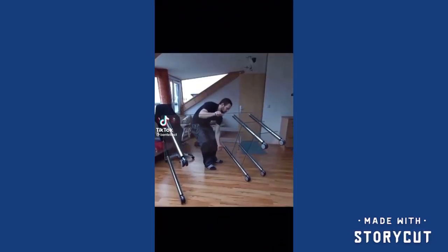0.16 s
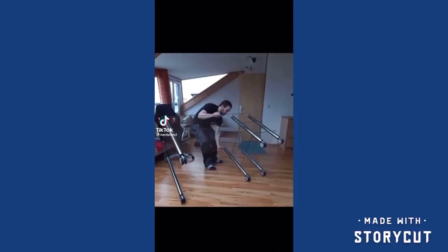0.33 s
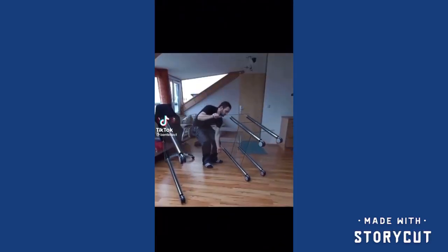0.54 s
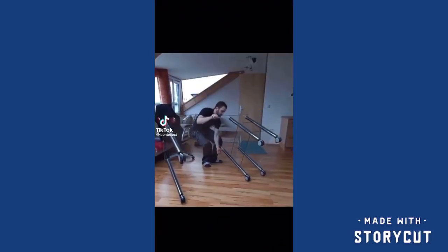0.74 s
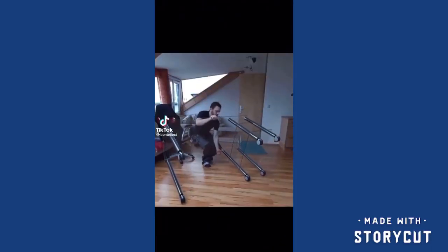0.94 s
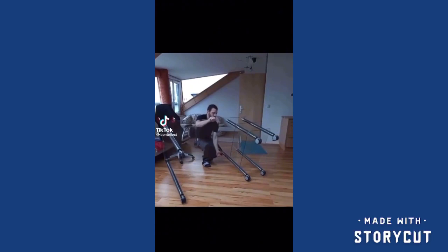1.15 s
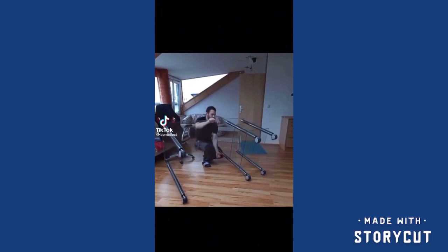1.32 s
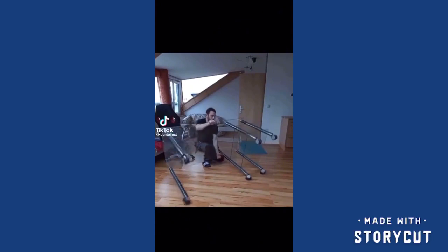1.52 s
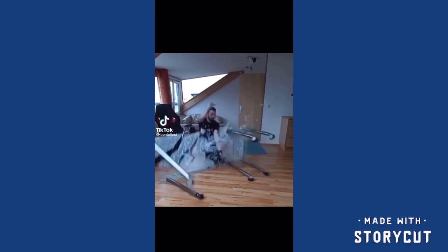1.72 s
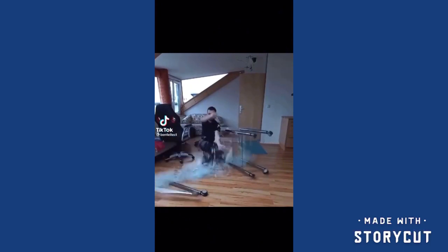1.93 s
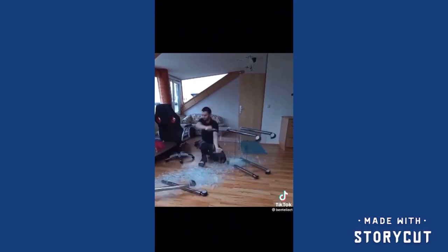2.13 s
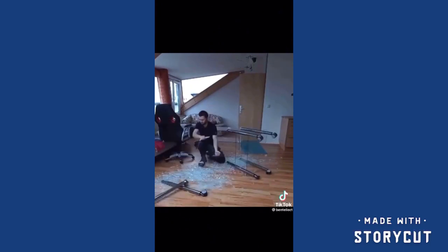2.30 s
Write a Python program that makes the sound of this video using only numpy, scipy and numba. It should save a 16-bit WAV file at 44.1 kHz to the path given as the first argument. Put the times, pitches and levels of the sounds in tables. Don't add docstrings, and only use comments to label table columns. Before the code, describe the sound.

A glass tabletop shatters in a live attic room with a wooden floor. Over low room hum, soles scrape faintly with small knocks from 0 to 1.1 s. Knocks and metallic skids grow from 1.1 s, and the steel frame bangs at 1.68 s. The pane cracks at 1.75 s, then dense ringing shards and thudding pieces rain until the end, around 2.45 s, still falling, echoing and compressed by a phone.

```python
import sys
import numpy as np
from scipy import signal
from scipy.fft import rfft, irfft
from scipy.io import wavfile
from scipy.ndimage import uniform_filter1d
from numba import njit

SR = 44100
rng = np.random.default_rng(int(sys.argv[2]) if len(sys.argv) > 2 else 0)


def transcribe(u):
    v = np.clip(np.atleast_2d(u).T, -1, 1)
    q = np.round(v * 32767).astype(np.int16)
    wavfile.write(sys.argv[1], SR, q)


def makeup_ratio(level_db):
    decades = np.asarray(level_db, float) / 20
    return 10 ** decades


N = 108530
LARGEST_DB = 10

# (frequency [Hz], level [dB])
HUSH_COLOUR = [(24, -55), (40, -18), (108, -4.5), (177, -18), (244, -1.5), (784, -30.5), (1650, -20.5),
               (12600, -44), (15000, -28.5)]
# (frequency [Hz], width [Hz], level [dB])
HUMS = [(114.5, 24, -63.5), (241.8, 12, -55.5), (506.5, 15, -67.5), (1112, 60, -69.5)]
# (centre [s], half length [s], level [dB], tilt [dB/octave])
SCRAPE_SWELLS = [(0., 0.018, -45.5, -2.5), (0.265, 0.06, -44, 0), (0.515, 0.028, -51.5, 11.5),
                 (0.564, .03, -57.5, 0.5), (0.712, 0.027, -48, -1), (0.785, 0.046, -42.5, 0.5),
                 (1, 0.07, -48, 0), (1.172, 0.032, -55, -2), (1.315, 0.045, -48, -3),
                 (1.407, 0.055, -52, -6), (1.443, 0.017, -50, -4.5), (1.574, 0.075, -38.5, -5.5),
                 (.16, 0.1, -60.5, 2)]
# (frequency [Hz], level [dB])
SCRAPE_COLOUR = [(300, -3.5), (800, -13), (1200, -3), (2000, -2), (4000, 0), (8000, -8.5), (15000, -14)]
# (centre [s], half length [s], frequency [Hz], width [Hz], level [dB])
SQUEAK_SOUND = (0.9, -0.02, 1647, 345, -46.5)
# (time [s], level [dB], body [Hz], tick level [dB], sharpness Q [-])
FLOOR_KNOCKS = [(0.206, -49, 390, -76, 1.8), (.222, -52, 496, -54, 6.6), (1.132, -41, 321, -57.5, 7.1),
                (1.148, -52, 603, -65, 3.2), (1.19, -48, 487, -75, 2.6), (1.268, -36, 76.6, -54.5, 2.7),
                (1.3, -54.5, 764, -74, 2.9), (1.365, -57, 750, -70, 1.8), (1.41, -56.5, 800, -64, 2.9),
                (1.31, -42.5, 249, -68, 7.7), (1.344, -46.5, 328, -68, 2.4), (1.456, -42, 322, -64, 1.4),
                (1.459, -38.5, 99, -72, 3.2), (1.485, -44.5, 260, -58, 1.2), (1.53, -35, 356, -66, 1.43),
                (1.53, -46, 960, -71, 2.8), (1.555, -38, 306, -72, 2.4), (1.565, -45.5, 800, -66, 4.6),
                (1.602, -37.5, 524, -40.5, 1.3), (1.623, -36, 95, -41, 2.5), (1.66, -29.5, 303, -39, 2.3)]
# (frequency [Hz], level [dB])
TICK_COLOUR = [(300, -3), (1500, -0.5), (4000, -2), (9000, -19), (15000, -33)]
# (start [s], length [s], level [dB])
LEG_SKIDS = [
    (1.274, 0.02, -40.5),
    (1.44, 0.017, -37.5),
    (1.62, .01, -52),
]
# (frequency [Hz], level [dB])
SKID_COLOUR = [(600, -22), (1600, 6), (4000, 2.5), (8000, -0.5), (12000, -7), (16000, 10)]
# (time [s], level [dB])
LEG_BLOWS = [
    (1.276, -52),
    (1.446, -49),
    (1.608, -44.5),
    (1.663, -36),
    (1.684, -25),
    (1.697, -26.5),
    (1.706, -28),
    (1.749, -21),
    (1.79, -30),
    (1.82, -31),
]
# (frequency [Hz], level [dB], time to fall 60 dB [s])
TUBE_MODES = [(1034, -5.5, 0.054), (1148, -5, 0.14), (1544, -5.5, 0.26), (1620, -0.5, 0.073),
              (1730, -15, 0.1), (1815, -19, 0.067), (1900, -4.5, 0.098), (3250, 0, 0.18), (3513, -6, 0.097),
              (3840, -16, 0.051), (3920, -15, 0.08), (4660, -27, 0.035)]
# (time [s], level [dB])
FRAME_LEVEL = [
    (1.594, -44),
    (1.604, -32),
    (1.65, -35.5),
    (1.68, -15.5),
    (1.702, -13),
    (1.718, -17.5),
    (1.73, -32),
    (1.76, -31.5),
]
# (frequency [Hz], level [dB])
FRAME_TONE = [(60, -29), (200, -1.5), (330, 2.5), (700, -5), (1500, -4.5), (2100, -7.5), (2800, -19),
              (4000, -15), (12000, -47)]
# (time [s], level [dB])
SLAB_LEVEL = [
    (1.772, -51),
    (1.83, -25.5),
    (1.85, -22.5),
    (1.961, -18),
    (2.06, -19),
    (2.2, -22),
    (2.34, -25),
    (2.38, -19),
    (2.46, -36),
]
# (frequency [Hz], level [dB])
BOARD_COLOUR = [(40, -26.5), (95, 1.5), (180, -3), (350, 0.5), (600, -1.5), (1100, -13.5), (2500, -32.5)]
# (time [s], level [dB], frequency [Hz])
JOIST_THUDS = [(1.528, -37.5, 96), (1.645, -32.5, 90), (1.765, -24.5, 94), (1.817, -28.5, 88.5),
               (1.874, -21.5, 103), (1.948, -21, 98), (2.08, -25, 123), (2.146, -28, 96.6),
               (2.245, -23.5, 134), (2.307, -23, 97), (2.338, -26, 97), (2.381, -30, 101)]
# (centre [s], half length [s], level [dB])
SPLINTER_SHOWERS = [
    (1.77, 0.028, -26),
    (1.7, 0.011, -36),
    (1.8, .018, -30),
    (2.3, .022, -33),
    (2.225, .045, -34),
    (1.7, .01, -58),
    (.765, .015, -60),
]
# (frequency [Hz], level [dB])
SPLINTER_COLOUR = [(6000, -30), (10000, -11), (13000, -6), (16000, 1)]
# (time [s], level
# [dB], frequency [Hz], time to fall 60 dB [s])
SINGLE_NOTES = [(.262, -62, 1810, .15), (.742, -55, 1790, .12), (.775, -56, 1570, .15),
                (1.175, -45.5, 251, .2), (1.305, -55, 1096, 0.13), (1.435, -55, 1070, .15),
                (1.56, -53, 800, 0.14), (1.686, -26, 1700, .15), (1.684, -20, 1326, 0.18),
                (1.686, -26, 2080, 0.11), (1.70, -27, 328, .15), (1.742, -28, 1904, 0.11),
                (2.15, -25, 2120, 0.16), (1.654, -29, 977, 0.096), (1.66, -35, 3910, 0.092),
                (1.686, -26, 3250, 0.082), (1.691, -32.5, 4000, .1), (1.681, -25, 339, 0.19),
                (1.745, -23, 1154, .1), (1.755, -27.5, 3360, .3), (1.785, -29, 1870, 0.18),
                (1.79, -28.5, 1520, 0.34), (1.80, -34, 1696, .2), (1.838, -23.5, 267, 0.27),
                (1.845, -27.5, 1104, 0.16), (1.845, -21.5, 488.7, 0.19), (1.864, -23.5, 4600, 0.16),
                (1.883, -21, 492, 0.14), (1.937, -24.5, 518.5, 0.18), (1.94, -25, 1031, 0.14),
                (1.95, -37, 1850, 0.12), (1.96, -19, 341, 0.18), (2.01, -20.5, 386, 0.12),
                (2.014, -24, 283, .15), (2.04, -17.5, 244, .15), (2.03, -26.5, 4010, .2),
                (2.09, -23, 344, 0.42), (2.185, -27, 1800, .15), (2.215, -26, 1038, 0.13),
                (2.22, -21.5, 356, 0.19), (2.263, -24, 623.5, 0.19), (2.269, -27, 1560, 0.18),
                (2.289, -21, 362, 0.22), (2.36, -21.5, 490, .15), (2.375, -32.5, 1701, 0.24)]
# (time [s], level [dB])
RAIN_LEVEL = [
    (1.76, -21.5),
    (1.85, -16.5),
    (1.95, -16),
    (2.05, -15),
    (2.15, -15.5),
    (2.27, -17.5),
    (2.36, -18.5),
    (2.46, -19.5),
]
# (frequency [Hz], level [dB])
SHARD_COLOUR = [(500, -2.5), (1000, -4.5), (2000, -3), (4000, -0.5), (6000, -6), (9000, -13), (13000, -20),
                (16000, -34)]
# (frequency [Hz], width [Hz], level [dB])
MIC_BUMPS = [(800, 830, 1.5), (1084, 165, 4.5), (1706, 398, 6.5), (2835, 860, -2), (3880, 370, 2.5),
             (6970, 1530, -3), (12300, 1560, 5)]


def level(x, db):
    return x * makeup_ratio(db) / np.sqrt(np.mean(x ** 2) + 1e-30)


def curve(table):
    s, db = np.array(table, float).T
    return makeup_ratio(np.interp(np.arange(N) / SR, s, db, left=-150))


def shape(table, hz):
    f, db = np.array(table, float).T
    return np.interp(np.log(np.maximum(hz, 1)), np.log(f), db)


def colour(x, db_of):
    log_gain = db_of(np.fft.rfftfreq(4096, 1 / SR)) * np.log(10) / 20
    c = irfft(log_gain)
    c[1:2048] = 2 * c[1:2048]
    c[2049:] = 0
    return signal.fftconvolve(x, irfft(np.exp(rfft(c))))[:len(x)]


def band(x, hz, width):
    return signal.lfilter(*signal.iirpeak(hz, hz / width, SR), x)


def uneven_db(u, spread_db):
    return np.minimum(-spread_db * np.log(1 - u), LARGEST_DB)


def clicks(per_s, spread_db):
    chance, sign, size = rng.random((3, N))
    hit = chance < per_s / SR
    return level(hit * np.sign(sign - .5) * makeup_ratio(uneven_db(size, spread_db)), 0)


def walk(rate):
    k = int(SR / rate)
    steps = np.repeat(rng.standard_normal(N // k + 1), k)
    return 1.3 * uniform_filter1d(steps, k)[:N]


def swell(centre, half):
    return np.exp(-.5 * ((np.arange(N) / SR - centre) / half) ** 2)


def clatter(table, per_s, spread_db, level_curve):
    body = colour(clicks(per_s, spread_db), lambda f: shape(table, f))
    return level(body, 0) * curve(level_curve)


@njit
def rings(start, hz, cycles, size, n, sr):
    out = np.zeros(n)
    for k in range(len(start)):
        turn = np.exp((2j * np.pi - 6.9 / cycles[k]) * hz[k] / sr)
        z = size[k] + 0j
        i = int(start[k])
        end = min(n, i + int(cycles[k] * sr / hz[k]))
        while i < end:
            out[i] += z.imag
            z *= turn
            i += 1
    return out


def hush():
    air = level(colour(rng.standard_normal(N), lambda f: shape(HUSH_COLOUR, f)), -53)
    out = air * makeup_ratio(0.31 * walk(3.4))
    for hz, width, db in HUMS:
        hum = band(band(rng.standard_normal(N), hz, width), hz, width)
        out = out + level(hum, db)
    return out


def scrapes():
    grit = clicks(9000, 2.) * makeup_ratio(.6 * walk(39.8))
    out = 0
    for s, half, db, tilt_db in SCRAPE_SWELLS:
        tone = colour(grit, lambda f: shape(SCRAPE_COLOUR, f) + tilt_db * np.log2(np.maximum(f, 200) / 2000))
        out = out + level(tone, db) * swell(s, half)
    return out


def squeak():
    s, half, hz, width, db = SQUEAK_SOUND
    return level(band(clicks(600, 3.), hz, width), db) * swell(s, half)


def knocks():
    body_rise_s, tick_rise_s, tick_decay_s = .009, 0.0027, 0.016
    t = np.arange(4096) / SR
    out = np.zeros(N + len(t))
    tick_fade = np.exp(-t / tick_decay_s) * np.minimum(t / tick_rise_s, 1)
    for s, db, hz, tick_db, q in FLOOR_KNOCKS:
        rise = np.minimum(t / np.maximum(2 / hz, body_rise_s), 1)
        body = np.sin(2 * np.pi * hz * t) * np.exp(-np.pi * hz * t / q) * rise
        grit = rng.standard_normal(len(t))
        tick = colour(grit * tick_fade, lambda f: shape(TICK_COLOUR, f))
        i = int(s * SR)
        out[i:i + len(t)] += level(body, db) + level(tick, tick_db)
    return out[:N]


def skids():
    edge_s = 0.0017
    t = np.arange(N) / SR
    hiss = level(colour(clicks(12000, 2.), lambda f: shape(SKID_COLOUR, f)), 0)
    gain = 0
    for s, length, db in LEG_SKIDS:
        gain = gain + makeup_ratio(db) * np.clip(np.minimum(t - s, s + length - t) / edge_s, 0, 1)
    return hiss * gain


def legs():
    scatter_db, detune = 4.5, 0.006
    s, db = np.array(LEG_BLOWS).T
    hz, mode_db, t60 = np.array(TUBE_MODES).T
    u = rng.standard_normal((len(s), len(hz), 2))
    f = hz * (1 + detune * u[..., 0])
    size = makeup_ratio(db[:, None] + mode_db + scatter_db * u[..., 1])
    start = np.repeat(s * SR, len(hz))
    return rings(start, f.ravel(), (f * t60).ravel(), size.ravel(), N, 1. * SR)


def frame():
    return clatter(FRAME_TONE, 1500, 5.5, FRAME_LEVEL)


def slabs():
    return clatter(BOARD_COLOUR, 350, 2, SLAB_LEVEL)


def thuds():
    sharpness_q = 4.76
    t, out = np.arange(N) / SR, 0
    for s, db, hz in JOIST_THUDS:
        after = np.maximum(t - s, 0)
        fade = np.exp(-np.pi * hz * after / sharpness_q) * np.minimum(after * hz, 1)
        out = out + makeup_ratio(db) * 4 * np.sin(2 * np.pi * hz * after) * fade
    return out


def splinters():
    dust = level(colour(clicks(9000, 3.), lambda f: shape(SPLINTER_COLOUR, f)), 0)
    return dust * sum(makeup_ratio(db) * swell(s, half) for s, half, db in SPLINTER_SHOWERS)


def single_notes():
    rise_s = 0.0057
    t, out = np.arange(N) / SR, 0
    for s, db, hz, t60 in SINGLE_NOTES:
        after = np.maximum(t - s, 0)
        fade = makeup_ratio(db - 60 * after / t60) * np.minimum(after / rise_s, 1)
        out = out + 2 * np.sin(2 * np.pi * hz * after) * fade
    return out


def glass():
    burst_s, crack_db, crack_decay_s, rise_s = 1.749, 0, .005, .007
    shards, shard_cycles, spread_db = 14000, 21.5, 2.5
    chunk_share, chunk_cycles, chunk_db = .06, 70, 5
    when, pitch, kind, luck = rng.random((shards, 4)).T
    hz = 500 * 32 ** pitch
    start = (burst_s - rise_s + when * (N / SR - burst_s)) * SR
    chunk = kind < chunk_share
    cycles = np.where(chunk, chunk_cycles, shard_cycles * 4 ** (kind - .5))
    shard_db = shape(SHARD_COLOUR, hz) + chunk_db * chunk + uneven_db(luck, spread_db)
    size = makeup_ratio(shard_db) * hz / 2000 / np.sqrt(cycles)
    rain = rings(start, hz, cycles, size, N, 1. * SR)

    after = np.arange(N) / SR - burst_s
    crack_gain = np.clip(after / rise_s + 1, 0, 1) ** 2 * np.exp(-np.abs(after) / crack_decay_s)
    crack = colour(rng.standard_normal(N) * crack_gain, lambda f: shape(SHARD_COLOUR, f))

    first_db = RAIN_LEVEL[0][1]
    onset = [(burst_s - rise_s, first_db - 20), (burst_s, first_db)]
    gain = curve(onset + RAIN_LEVEL) * makeup_ratio(1.5 * walk(90))
    return rain * gain / np.std(rain[after > 0]) + crack * makeup_ratio(crack_db)


def room(x):
    t60_s, treble_t60_s, delay_s = 0.41, 0.26, 0.0037
    split_hz, top_hz, low_hz, wet_db = 1180, 9140, 111, 3
    places, place_s = 8, .008
    t, hop = np.arange(SR // 2) / SR, int(place_s * SR)
    noise = rng.standard_normal((places, len(t))) * np.clip(t / delay_s - .5, 0, 1)
    low = signal.lfilter(*signal.butter(1, split_hz, fs=SR), noise)
    high = signal.lfilter(*signal.butter(1, top_hz, fs=SR), noise - low)
    tail = low * makeup_ratio(-60 * t / t60_s) + high * makeup_ratio(-60 * t / treble_t60_s)
    tail = signal.lfilter(*signal.butter(2, low_hz, 'high', fs=SR), tail)
    place = np.repeat(rng.integers(0, places, N // hop + 1), hop)[:N]
    here = 1. * (place == np.arange(places)[:, None])
    share = np.sqrt(np.abs(uniform_filter1d(here, hop, axis=1)))
    tail = tail / np.sqrt(np.sum(tail[0] ** 2))
    wet = signal.fftconvolve(x * share, tail, axes=1)[:, :N].sum(axis=0)
    return x + makeup_ratio(wet_db) * wet


def scene():
    blows = knocks() * makeup_ratio(-3.0) + thuds()
    rub = scrapes() + squeak()
    skid, rung = skids(), single_notes()
    air = room(rub + blows + skid + legs() + frame() + slabs() + glass() + rung * makeup_ratio(-5.5))
    direct = blows * makeup_ratio(-4) + skid * makeup_ratio(-3) + rung * makeup_ratio(4.5) + splinters()
    return ((air + direct) * makeup_ratio(-7.5) + hush())[None]


def low_pass(x):
    return signal.sosfilt(signal.butter(12, 15740, fs=SR, output="sos"), x)


def record(dry):
    low_cut_hz, top_hz, top_db_per_khz = 42.5, 13000, -6
    limit_db, limit_ratio, limit_window_s, clip = -13.5, 1.9, 0.0072, 1.65

    def mic_db(f):
        bumps = sum(db * np.exp(-.5 * ((f - hz) / (width / 2)) ** 2) for hz, width, db in MIC_BUMPS)
        return bumps + top_db_per_khz * np.maximum(f - top_hz, 0) / 1000

    x = colour(dry[0], mic_db)
    x = signal.lfilter(*signal.butter(3, low_cut_hz, 'high', fs=SR), x)
    loudness = np.sqrt(uniform_filter1d(x ** 2, int(limit_window_s * SR)) + 1e-12)
    x = x * np.minimum(1, makeup_ratio(limit_db) / loudness) ** (1 - 1 / limit_ratio)
    mix = np.tanh(x / clip) * clip
    return low_pass(mix[None])


dry = scene()
out = record(dry)
transcribe(out)
```